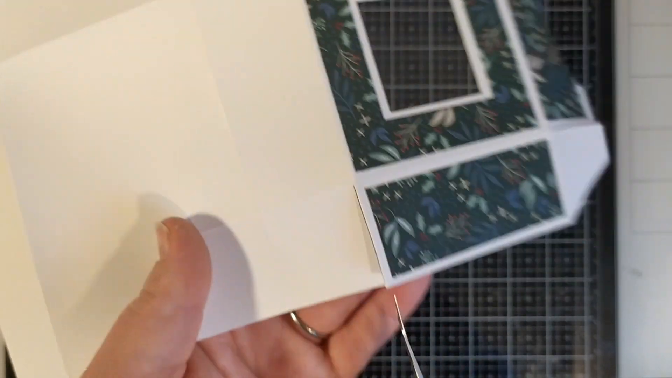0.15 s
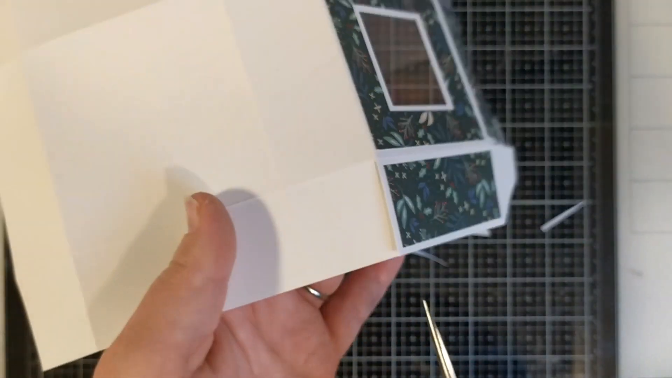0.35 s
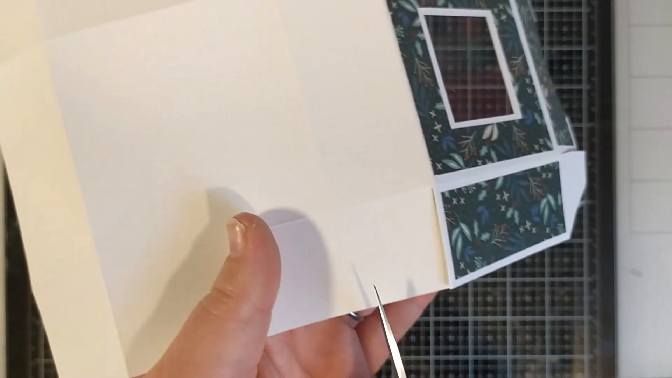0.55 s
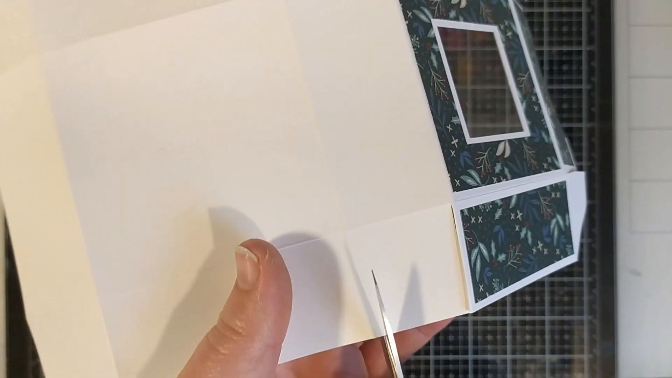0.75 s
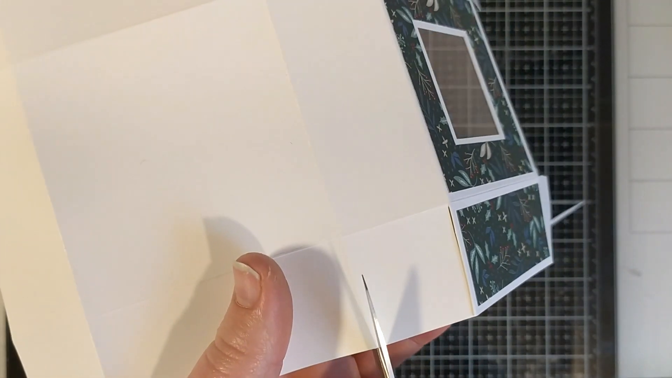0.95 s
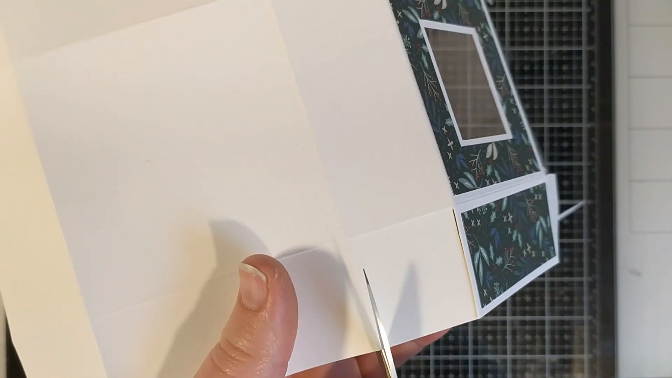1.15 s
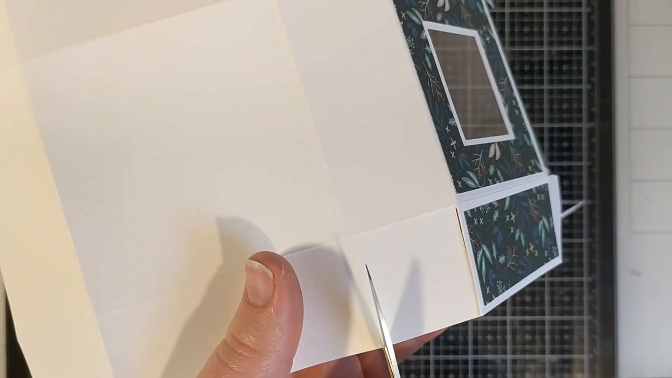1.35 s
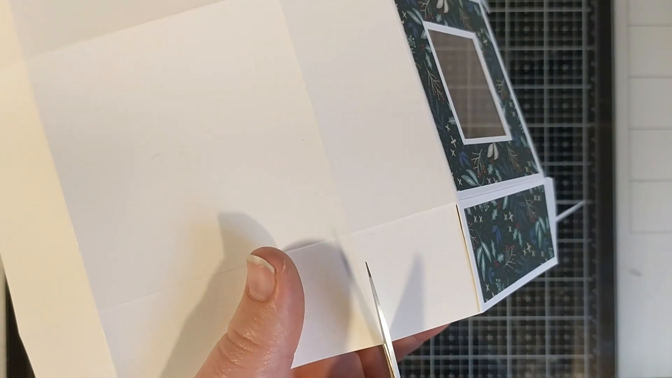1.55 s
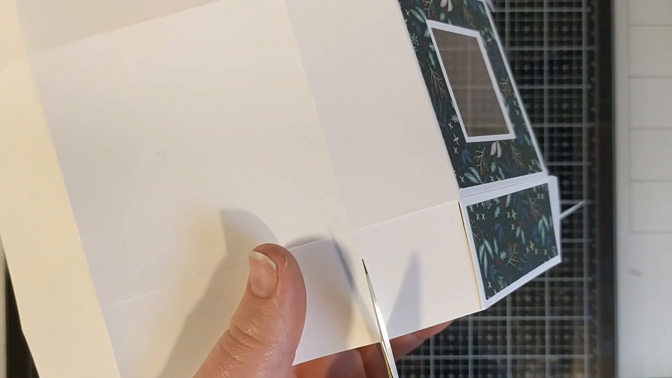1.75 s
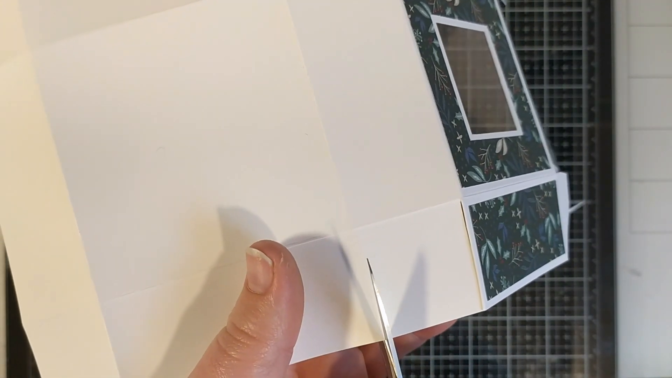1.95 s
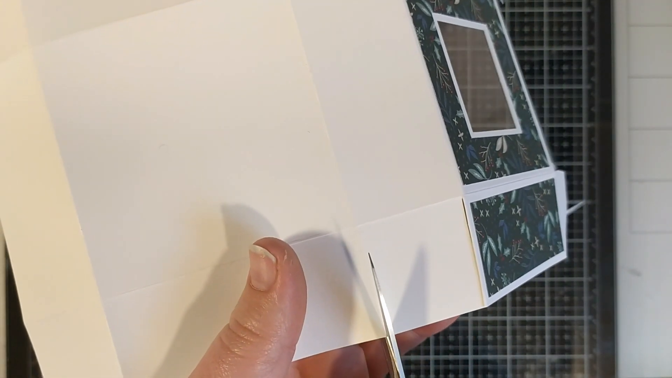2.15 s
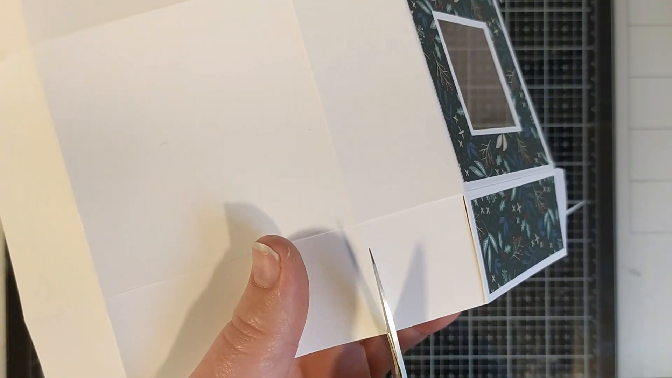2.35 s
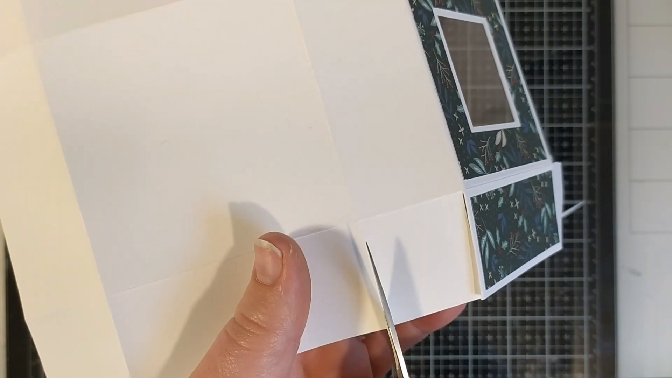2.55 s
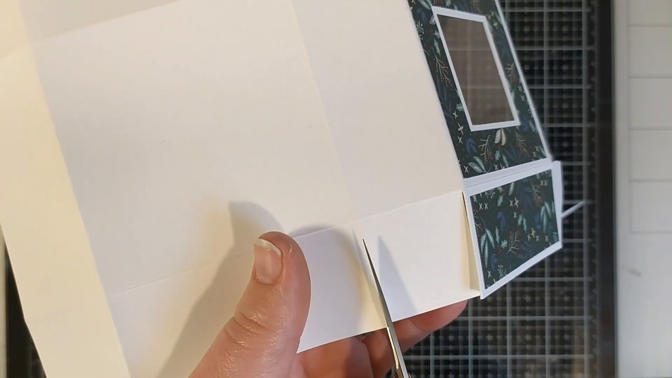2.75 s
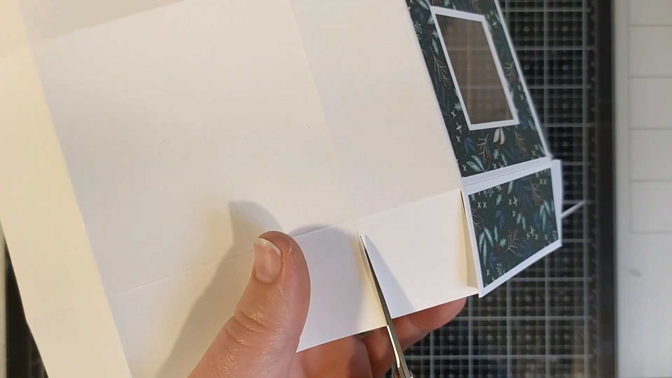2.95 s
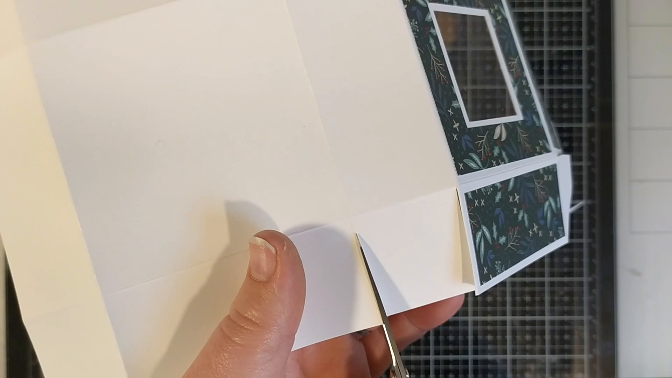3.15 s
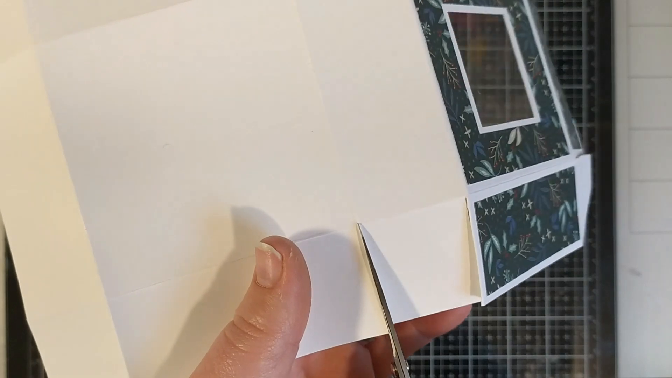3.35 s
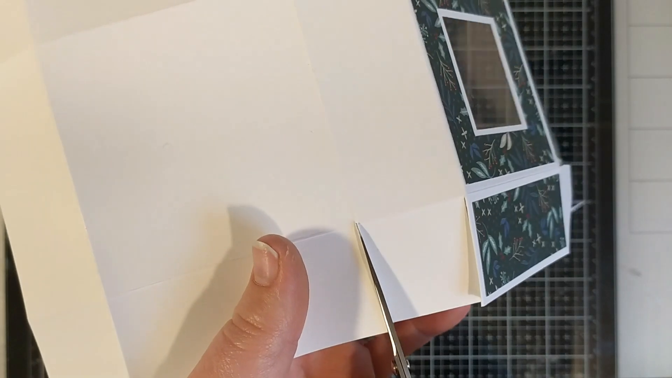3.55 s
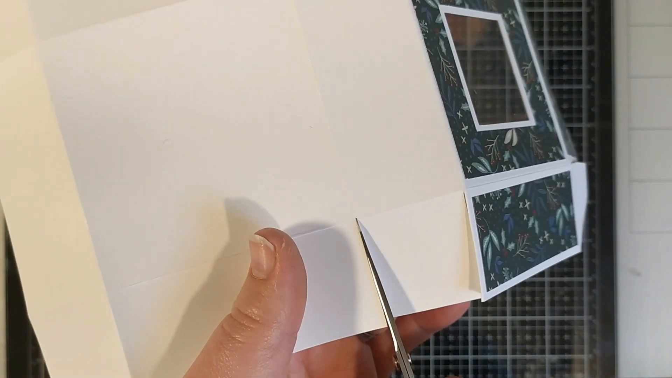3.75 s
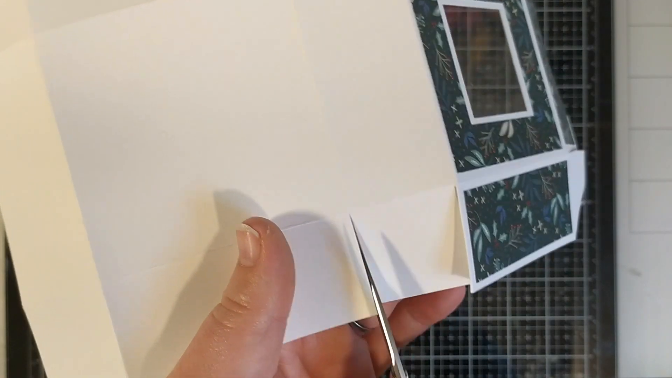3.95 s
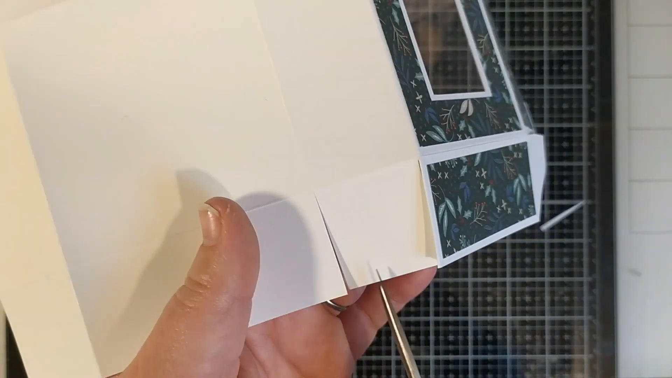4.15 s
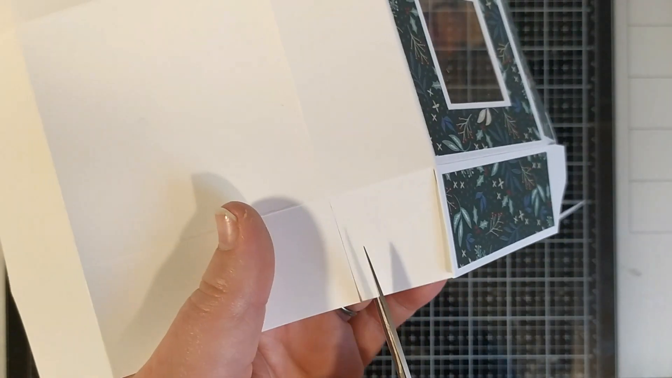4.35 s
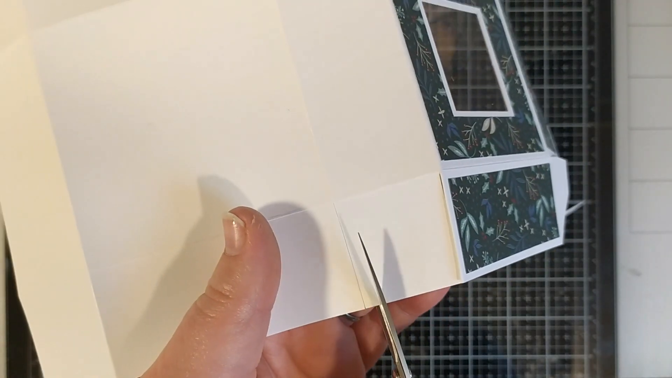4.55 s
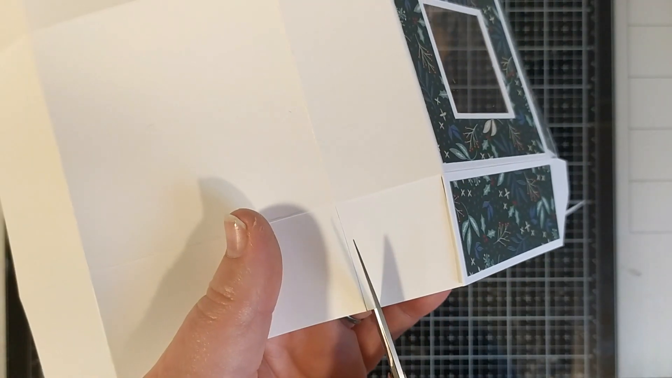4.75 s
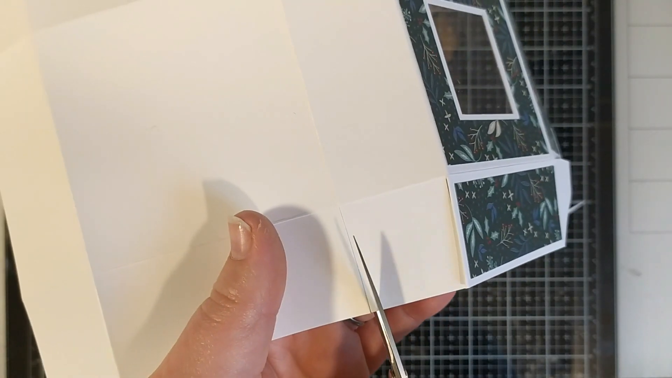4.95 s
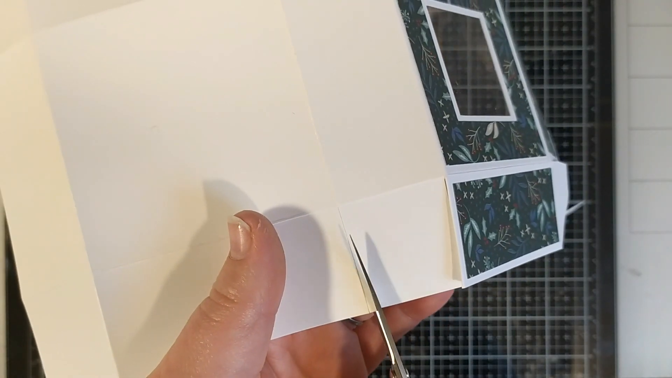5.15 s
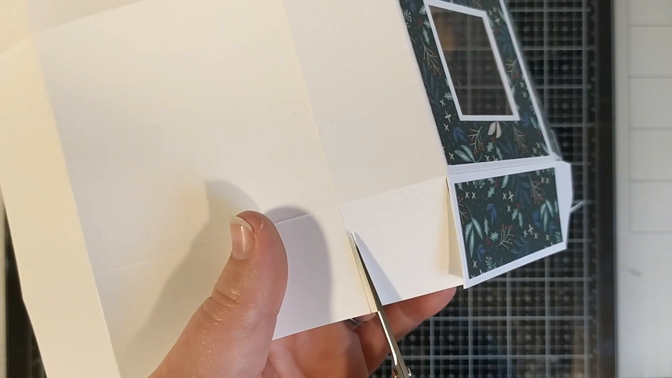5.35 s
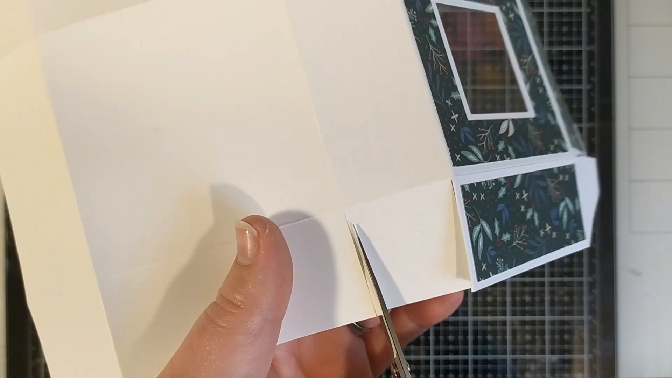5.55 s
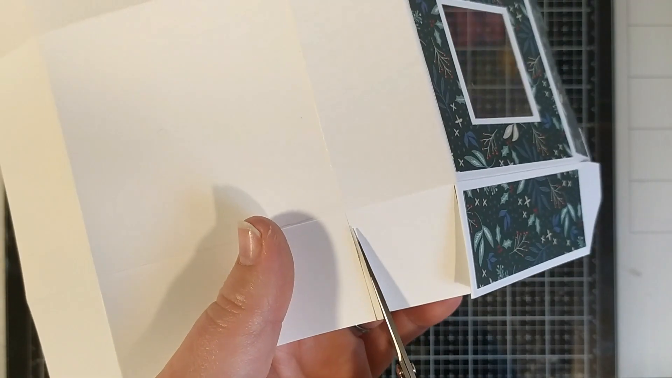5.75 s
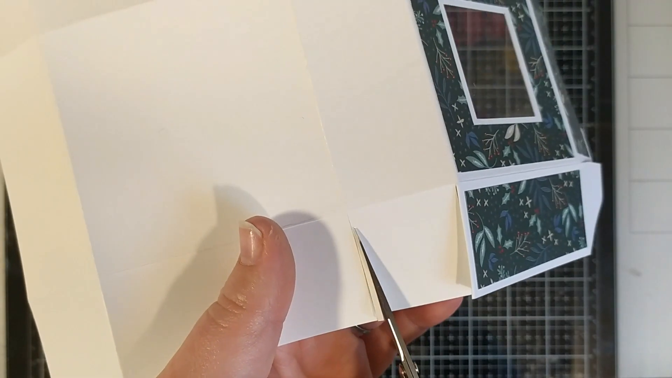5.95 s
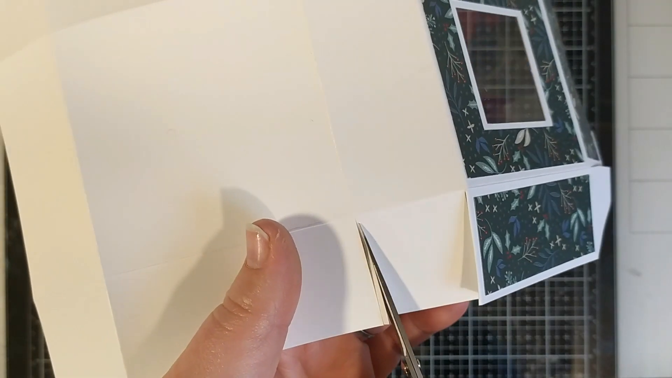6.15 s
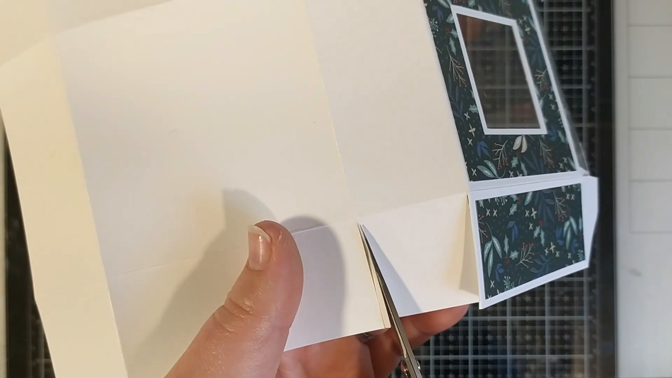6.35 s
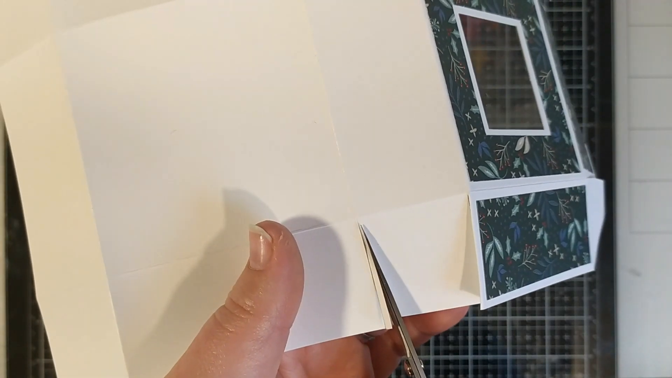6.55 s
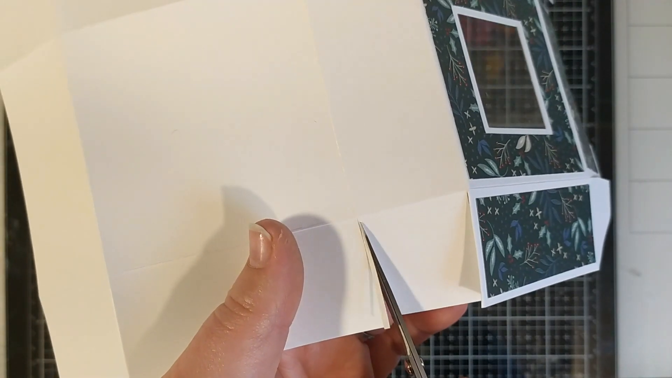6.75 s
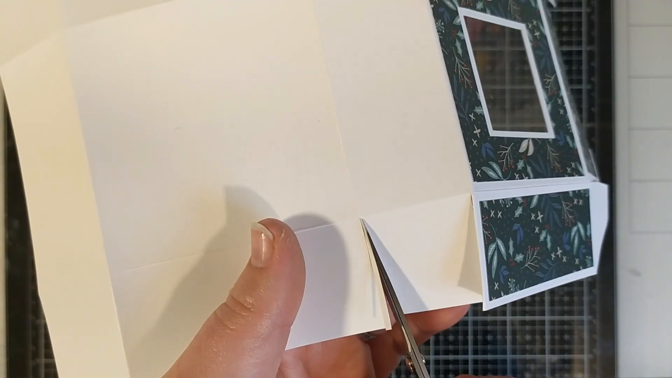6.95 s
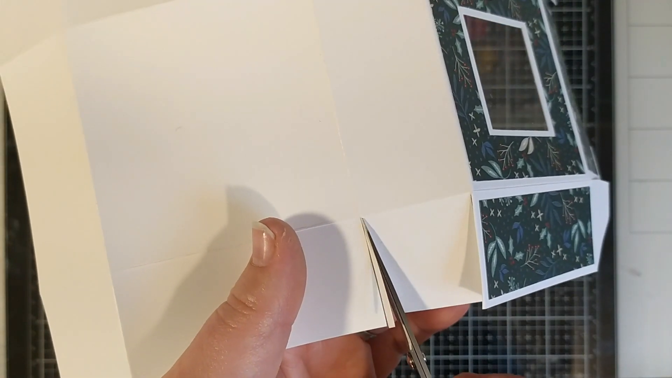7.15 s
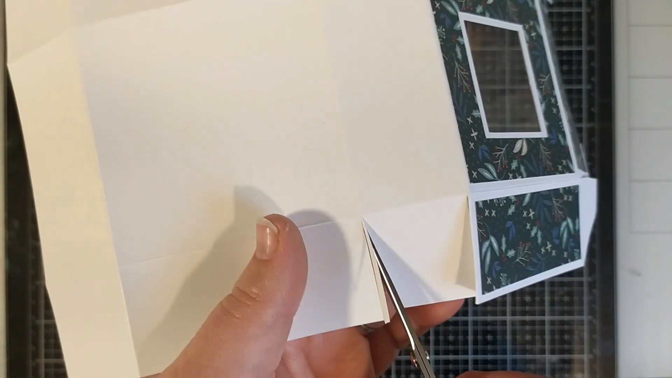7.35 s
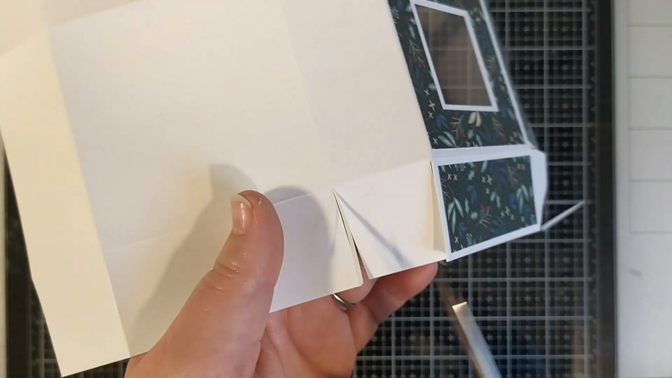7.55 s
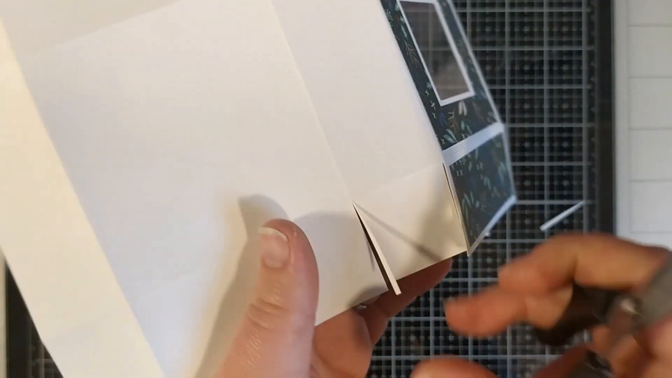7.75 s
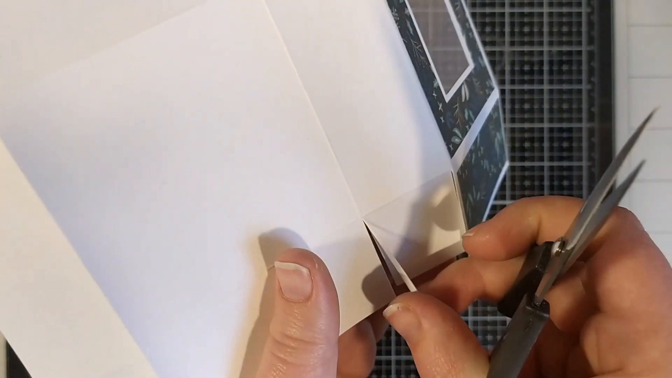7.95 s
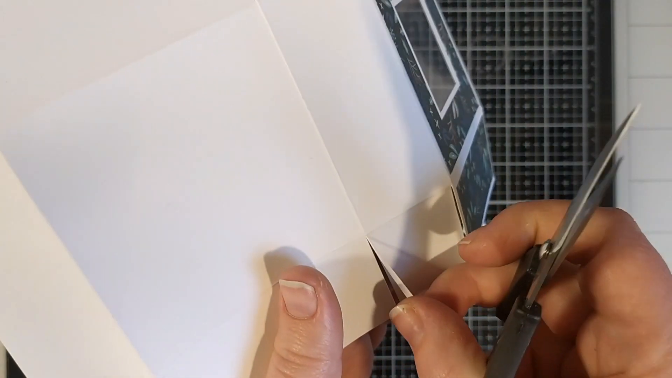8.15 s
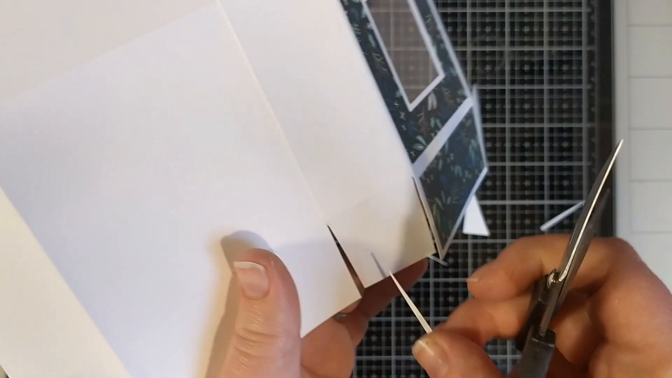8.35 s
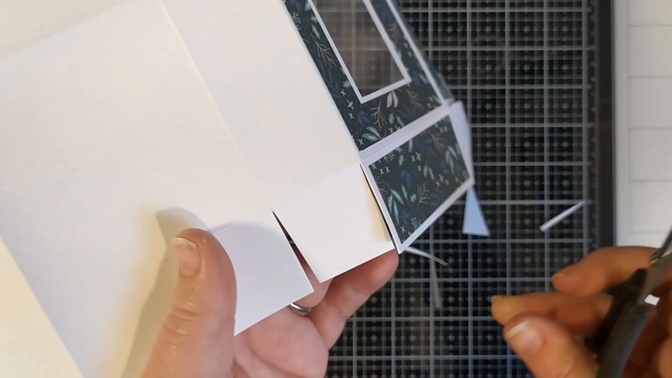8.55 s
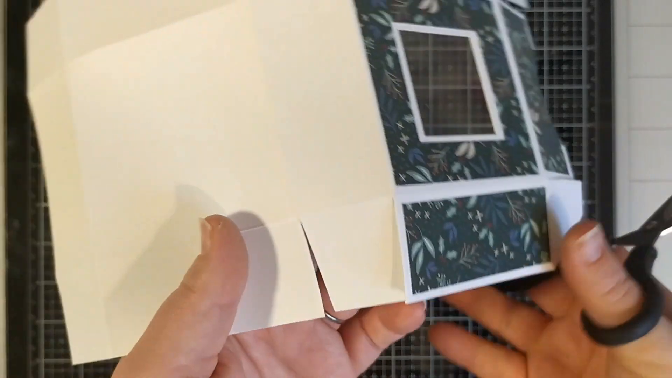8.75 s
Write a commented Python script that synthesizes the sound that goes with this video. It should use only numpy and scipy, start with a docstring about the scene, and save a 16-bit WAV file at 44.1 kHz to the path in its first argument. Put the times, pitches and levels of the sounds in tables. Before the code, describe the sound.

Scissors cut slits into stiff card, close to a stereo microphone in a small quiet room. Fibres snap and the blades slide with a bright hiss, then a dull soft bump. After a pause come several crunching cuts with dry papery knocks, the last ending in the loudest, sharpest crack. The blades slide out and the card is handled softly over faint, steady air noise.

```python
"""Scissors cut slits into stiff card over a craft table in a small quiet room, whose steady air noise runs throughout.
At first fibres snap as broadband bursts and the blades slide over the card with a fine hiss; a dull rumble follows.
Further cuts crunch as coarse grains, snap and slide; blows set the sheet swinging as damped, gliding sines.
The last cut ends in a sharp crack, then smooth slides draw the blades out and the card crunches softly in the hand.
Snaps, crunches and slides are all filtered by the resonant cutting edge and sheet, with dense reflections."""
import sys
import numpy as np
from scipy import signal
from scipy.fft import rfft, irfft
from scipy.io import wavfile
from scipy.ndimage import uniform_filter1d

SR = 44100
rng = np.random.default_rng(int(sys.argv[2]) if len(sys.argv) > 2 else 0)


def store_wav(level_fs):
    """Save 16-bit WAV to argv[1]."""
    pcm = np.round(np.clip(np.atleast_2d(level_fs), -1, 1) * 32767)
    wavfile.write(sys.argv[1], SR, pcm.T.astype(np.int16))


N = 392029
TIME = np.arange(N) / SR
TAPS = 8192   # length of the filters and of each swing, samples
TAP_HZ = np.fft.rfftfreq(TAPS, 1 / SR) + 1   # kept above zero for logarithms
TAP_S = np.arange(TAPS) / SR

# resonant bodies: broad colours of sheet and cutting edge, columns [f/Hz, level/dB per Hz]
SHEET_COLOUR = [(70, -38), (150, -3), (250, 4), (420, 7.5), (700, -1), (1050, 3), (1580, -5), (2000, -3),
                (2800, -0.5), (3800, -4.5), (4800, -4.5), (7000, -23)]
EDGE_COLOUR = [(2000, -42), (4200, -10), (5200, -5), (7000, -5.5), (8300, -3.5), (9300, -2), (10500, -4.5),
               (11700, -14), (13500, -25.5), (15000, -25.5), (16500, -42.5)]
# resonances standing out of those colours, columns [f/Hz, width/Hz, lift/dB]
SHEET_MODES = [(434, 45, 5), (972, 50, 3), (1186, 35, 8), (1900, 70, 8), (2012, 70, 7), (2549, 80, 5),
               (2790, 80, 4), (3475, 55, 4), (4230, 70, 3)]
BLADE_MODES = [(8830, 300, 4), (9240, 140, 3), (9610, 70, 4), (10510, 60, 4)]
# the two microphone ports colour the edge differently, columns [f/Hz, left minus right level/dB]
PORT_COLOUR = [(5000, 3), (7800, -4.5), (10000, -1.5), (12000, 8)]


def scissors_and_card():
    """Source-filter principle: snaps, crunches and slides all excite the same edge and sheet."""
    # 1 dB per octave between the corners
    slope = log_response(np.log2(np.clip(TAP_HZ, 180, 3200) / 1000))
    # leans 1 dB towards the high treble
    top = log_response(np.interp(TAP_HZ, [6000, 9000, 12500, 16000], [-.4, 0, 1, 0]))
    port_lean = log_response(at_hz(PORT_COLOUR, TAP_HZ)) * np.array([[1], [-1]]) / 2
    edge_body = body(EDGE_COLOUR, BLADE_MODES) + port_lean
    sheet_body = body(SHEET_COLOUR, SHEET_MODES)
    bodies = edge_body, sheet_body, slope, top
    return snaps(bodies) + crunches(bodies) + slides(bodies)


# tilt of a snap of middling sheet level, and tilt added by each dB of sheet above that level
SNAP_MID_DB, SNAP_TILT_DB_PER_OCTAVE, SNAP_BRIGHTENS = -44, 0.5, 0.15
EDGE_BRIGHTENS = 0.42   # tilt added for each dB of edge over sheet, within limits
CRACK_CLEAN_DB = 11.5   # an instant crack has this much less edge scatter, half as much less sheet and room scatter
# fibres giving way and blades ticking,
# columns [t/s, length/s, edge level/dB, sheet level/dB, left minus right level/dB]
SNAPS = [(.001, 0.0023, -40.5, -46.5, 1), (0.009, 0.013, -47, -49, -6), (0.023, 0.0022, -51.5, -52, 3),
         (0.204, 0.0063, -50.5, -45.5, 7), (0.373, 0.022, -57, -53.5, 0), (.478, 0.0073, -63.5, -58, -3),
         (0.706, 0.026, -46.5, -54, -1), (0.914, 0.0062, -61.5, -64.5, -2), (2.69, 0.026, -53.5, -50.5, 0),
         (2.919, 0.0096, -55, -50, 7), (3.002, 0.012, -45.5, -45, 4), (3.039, .013, -48, -56, -2),
         (3.064, 0.0063, -43.5, -41.5, -3), (3.101, 0.0069, -44.5, -43.5, -12.5),
         (3.145, 0.016, -53.5, -49, 1), (3.66, 0.0056, -54, -50, -9), (3.682, 0.008, -42, -41, -3),
         (3.727, 0.0073, -47, -49, 0), (3.7595, 0.0038, -48, -43.5, -4), (3.7966, 0.0041, -42.5, -42, -6),
         (3.99, 0.0025, -44, -45.5, -1), (4.712, 0.0085, -63.5, -56, -1), (4.732, 0.0022, -61, -62, 0),
         (4.798, 0.0053, -55.5, -55, -3), (4.993, 0.0078, -55.5, -57, -1), (5.101, 0.01, -57.5, -53.5, 0),
         (5.161, 0.0076, -55, -55.5, -2), (5.217, 0.015, -52.5, -52, 0), (5.248, 0.0085, -52, -52, 4),
         (5.275, 0.016, -46.5, -44.5, 2), (5.313, 0.0088, -45, -47.5, 2), (5.341, 0.004, -42.5, -48, -2),
         (5.354, 0.0031, -41, -43, -1), (5.371, 0.00077, -52, -54, 5), (5.393, 0.0024, -48.5, -45, -12),
         (5.811, 0.0038, -47.5, -50.5, -5), (5.8145, 0.0016, -41.5, -43.5, -3),
         (5.8542, 0.002, -41.5, -46.5, 5), (5.8564, 0.0048, -37, -38.5, -2.5),
         (5.944, 0.0092, -51, -53.5, -1), (6.213, 0.0057, -58.5, -69, -1), (6.467, 0.0098, -62.5, -59, 0),
         (6.622, 0.0064, -41.5, -45.5, -2), (6.6435, 0.0012, -36, -42, 5), (6.647, 0.0022, -47, -44, -1),
         (6.6786, 0.002, -42.5, -43, -1), (6.8586, 0.0045, -59.5, -44.5, 0), (7.306, .0018, -49, -41, 2),
         (7.317, 0.0018, -36, -34.5, 0), (7.335, 0.0022, -51, -37, -2), (7.3557, 0.00064, -24, -25.5, 4),
         (7.384, 0.0073, -41.5, -39, -6), (7.467, 0.0042, -40.5, -38.5, 2), (7.472, 0.0048, -38, -41, -1),
         (8.257, 0.0044, -49.5, -48, -5), (8.308, 0.0089, -59, -55, 2), (8.706, 0.0051, -54.5, -59, 5),
         (8.808, 0.027, -54, -60, 2)]


def snaps(bodies, crack=0.21, build_up=0.079):
    """Brittle fracture: a short snap is one broadband crack, a longer one a growing run of tearing fibres."""
    out = np.zeros((2, N))
    t = TAP_S[:TAPS // 4]
    for start, length, edge_db, sheet_db, side_db in SNAPS:
        length = max(length, 1e-4)
        run = (1 - np.exp(-t / (build_up * length))) / (1 + (t / length) ** 4)
        burst = unit_energy(run * fibres(len(t), per_s=3500, spread_db=4.5, hiss=0.37))
        sharpness = np.exp(-length / 0.0028)
        burst[0] += crack * np.e * sharpness
        burst = irfft(even(rfft(burst, TAPS), size=110))[:len(t)]
        # levels are rms over 10 ms
        burst = unit_energy(burst) * np.sqrt(SR / 100)
        tilt_db = SNAP_TILT_DB_PER_OCTAVE + SNAP_BRIGHTENS * (sheet_db - SNAP_MID_DB)
        tilt_db += EDGE_BRIGHTENS * np.clip(edge_db - sheet_db, -4, 5)
        clean_db = CRACK_CLEAN_DB * sharpness
        add(out, start, radiate(burst, bodies, edge_db, sheet_db, tilt_db, side_db, clean_db=clean_db))
    return out


# card crunching in a cut or bending in the hand, columns [start t/s, end t/s, edge level/dB,
# sheet level/dB, swell from start to end/dB, softening at both ends/dB, left minus right level/dB]
CRUNCHES = [(2.473, 2.672, -65, -65, 0, -2.5, 1.5), (2.706, 2.909, -58.5, -58, 13.5, 6, -0.5),
            (2.949, 3.057, -51, -53.5, 1, 1.5, 0), (3.628, 3.806, -63, -65, -18, 13, -3),
            (5.082, 5.384, -54.5, -56, 14.5, 6, 0), (5.793, 5.864, -60, -60, 1, 8, -1),
            (6.613, 6.698, -68, -64, 14, -6, 1), (7.356, 7.469, -58, -47, -6.5, -6, 2),
            (8.526, 8.889, -69, -67.5, 6.5, 2, -0.5)]


def crunches(bodies):
    """Impulsive noise: sparse fractures of widely uneven size crunch as the card gives way."""
    coarse = fibres(N, per_s=1300, spread_db=4.0, hiss=.12)
    return strokes(bodies, CRUNCHES, coarse, tilt_db=-0.5, gloss_db=2.0, judder_db=1.5,
                   attack_s=0.0015, release_s=0.0043)


# blades or fingers sliding along the card, columns [start t/s, end t/s, edge level/dB,
# sheet level/dB, swell from start to end/dB, softening at both ends/dB, left minus right level/dB]
SLIDES = [(0.056, 0.211, -41.5, -53, -3, 9, 0.5), (0.73, 0.825, -62, -63.5, -1, 0, 0),
          (0.888, 1.083, -68.5, -68, -6, 5.5, 3), (1.655, 1.711, -61, -59.5, -8, 8, 3),
          (1.907, 1.97, -66.5, -66.5, -15, -9.5, 1), (3.254, 3.366, -52, -54.5, -3.5, -2.5, 1),
          (3.983, 4.073, -44, -46, -0.5, 2, 1), (4.413, 4.624, -57, -60, -19, 4.5, -3.5),
          (5.528, 5.601, -54, -53.5, -4, -4.5, -3), (6.085, 6.179, -56, -54.5, -18.5, -3, -2),
          (6.218, 6.249, -61.5, -62, 1, -5, 0), (6.394, 6.417, -57, -49.5, -8, -2, -3),
          (6.815, 6.878, -64.5, -55.5, -9, -.5, -3), (6.95, 7.022, -71, -67.5, -18, -2, -1),
          (7.485, 7.554, -56.5, -59.5, -11, 1, 3), (7.548, 7.94, -65, -68.5, -5, 0, 0),
          (7.932, 8.111, -59, -59.5, -19, 5, -0.5)]


def slides(bodies):
    """Friction noise: dense, nearly equal grains under the unsteady pressure of a trembling hand."""
    pressure = amp(1.0 * resonant_noise(34, 45) + 1.0 * resonant_noise(6.9, 21))
    fine = pressure * fibres(N, per_s=4500, spread_db=1.1, hiss=0.18)
    return strokes(bodies, SLIDES, fine, tilt_db=1.07, gloss_db=-2, judder_db=0.5,
                   attack_s=0.0093, release_s=0.0082)


NEW_SPOT_S = .07   # a moving contact reaches a new spot on the card this often
# echo along the blade: mid-stroke delay, share by which it shrinks, strength per dB of edge over sheet
BLADE_ECHO_S, BLADE_ECHO_SHRINKS, BLADE_ECHO_PER_DB = .000115, .3, 0.12


def strokes(bodies, table, grain, tilt_db, gloss_db, judder_db, attack_s, release_s):
    """Stick-slip and comb filtering: grains judder, and an ever shorter blade echo shifts their colour."""
    out = np.zeros((2, N))
    rasp = unit_rms(grain * amp(judder_db * resonant_noise(53.0, 50)))
    for start, end, edge_db, sheet_db, swell_db, arch_db, side_db in table:
        span = slice(int(start * SR), int((end + 0.099) * SR))
        t = TIME[span]
        touch = 1 - np.exp(-(t - t[0]) / attack_s)
        lift_off = (1 + np.maximum(t - end, 0) / release_s) ** 3.0
        travel = np.clip((t - start) / (end - start), 0, 1) - .5
        level_db = swell_db * travel - arch_db * (2 * travel) ** 2
        drive = rasp[span] * touch / lift_off * amp(level_db)
        # the echo comes sooner as the contact runs towards the tip
        delay = BLADE_ECHO_S * (1 - BLADE_ECHO_SHRINKS * travel)
        echo = np.interp(t - delay, t, drive)
        share = np.clip(BLADE_ECHO_PER_DB * (edge_db - sheet_db), 0, .5)
        drive = (drive + share * echo) / np.hypot(1, share)
        # each spot radiates with reflections of its own
        spots = np.arange(0, min(len(t), (end - start) * SR), NEW_SPOT_S * SR).astype(int)
        for at, piece in zip(spots, np.split(drive, spots[1:])):
            add(out, t[at], radiate(piece, bodies, edge_db, sheet_db, tilt_db, side_db, gloss_db))
    return out


KNOCK_SPREAD_OCTAVES = 0.497
# a blow bends the sheet: typical share by which its swings shift at first, and time constant of the return
FLEX_DETUNE, UNBEND_S = .06, .012
# blows on the whole sheet, columns [t/s, level/dB, favoured f/Hz]
KNOCKS = [(.001, -39.5, 174), (.001, -46.5, 467), (.212, -38.5, 266), (3.8, -38.5, 850), (4.065, -45, 300),
          (5.223, -41, 235), (5.817, -36.5, 690), (5.857, -42.5, 360), (6.631, -38, 283), (6.646, -44, 232),
          (7.357, -25, 2710), (7.362, -31, 1110), (7.363, -37.5, 290), (7.39, -34.5, 487),
          (7.393, -36, 1003), (7.407, -35, 1450), (7.4427, -39.5, 900), (8.2596, -31, 263),
          (8.273, -37.5, 162)]
# swings of the sheet, columns [f/Hz, relative level/dB, 60 dB decay t/s]
SWINGS = [(172, -8.5, 0.18), (244, 1, 0.046), (436, 4, 0.093), (683, 1, 0.024), (868, 2.5, 0.024),
          (1195, 4, 0.056), (1974, 5.5, 0.032), (2760, 0.5, 0.025), (3270, -5, 0.036)]


def knocks(rise_s=0.00075):
    """Modal excitation: each blow stirs the damped swings near its favoured pitch, which glide as it unbends."""
    out = np.zeros((2, N))
    for start, db, favoured_hz in KNOCKS:
        for hz, mode_db, t60 in SWINGS:
            share = np.exp(-(np.log2(hz / favoured_hz) / KNOCK_SPREAD_OCTAVES) ** 2)
            bend = FLEX_DETUNE * rng.standard_normal() * np.exp(-TAP_S / UNBEND_S)
            pitch = hz * (1 + bend)
            envelope = amp(db + mode_db - 60 * TAP_S / t60) * (1 - np.exp(-TAP_S / rise_s))
            swing = envelope * np.sin(2 * np.pi * np.cumsum(pitch) / SR)
            add(out, start, share * swing * pan(-2.8))
    return out


RUMBLE_S = 1.2135   # start
# pass band of the hollow note, columns [low f/Hz, high f/Hz]
RUMBLE_BAND = (275, 395)
# envelopes of the hollow note and of the bass, columns [level/dB, attack t/s, decay/dB per s]
RUMBLE_NOTE = (-41, 0.01, 90)
RUMBLE_BASS = (-44, 0.072, 69)


def rumble():
    """Band-limited noise with exponential decay: a dull hollow note over a bass that lingers."""
    band = signal.butter(3, RUMBLE_BAND, "band", fs=SR, output="sos")
    hollow = signal.sosfilt(band, rng.standard_normal(N))
    note = unit_rms(hollow) + amp(-13.5) * resonant_noise(640, 800)
    note = signal.sosfilt(signal.butter(4, 1100, fs=SR, output="sos"), note)
    bass = resonant_noise(73, 75)
    return rise_and_fade(*RUMBLE_NOTE, RUMBLE_S) * note + rise_and_fade(*RUMBLE_BASS, RUMBLE_S) * bass


AIR_DB, WHINE_DB = -61, -83.5
WHINE_HZ, WHINE_WIDTH_HZ = 2955, 45   # the pitch wanders by half the width, rms
# room air common to both channels, columns [f/Hz, relative level/dB per Hz]
AIR_COLOUR = [(12, -7.5), (22, 2.5), (60, -10.5), (95, -9), (125, -19), (168, -11), (377, -12.5),
              (700, -21), (2320, -31.5), (2910, -32.5), (3200, -36.5), (6500, -38.5), (9500, -35),
              (16000, -56)]
# likeness of the air in the two channels, columns [f/Hz, correlation -1 to 1]
AIR_LIKENESS = [(180, 0.41), (550, 0.18), (1650, -0.25), (4970, 0.04)]


def air():
    """Diffuse-field noise: steady, most alike at both ports in the bass, with a thin whine of even strength."""
    hz = np.fft.rfftfreq(N, 1 / SR) + 1
    alike = np.clip(at_hz(AIR_LIKENESS, hz), -.95, .95)
    mid, side = rfft(rng.standard_normal((2, N))) * amp(at_hz(AIR_COLOUR, hz))
    side = side * np.sqrt((1 - alike) / (1 + alike))
    hush = unit_rms(irfft(np.array([mid + side, mid - side]), N))
    pitch = WHINE_HZ + WHINE_WIDTH_HZ / 2 * resonant_noise(45, 74)
    whine = unit_rms(np.sin(2 * np.pi * np.cumsum(pitch) / SR))
    return amp(AIR_DB) * hush + amp(WHINE_DB) * whine


def radiate(drive, bodies, edge_db, sheet_db, tilt_db, side_db, gloss_db=0, clean_db=0,
            bend_delay_s=0.001403):
    """Convolution and dispersion: one contact heard through edge and sheet, with its own reflections."""
    edge_body, sheet_body, slope, top = bodies
    # harder contacts are briefer and reach higher
    hardness_db = max(edge_db + 63.0, 0) * 0.21
    room = amp(-4.0 - clean_db / 2) * scatter(t60=0.13, onset_s=0.0031, above_hz=1200)
    edge_scatter = amp(5.0 - clean_db) * scatter(t60=0.033, onset_s=0.000273, above_hz=690)
    edge_paths = ports(.00003 + .00004 * rng.standard_normal()) + edge_scatter + room
    # bending waves cross the sheet slowly, the low ones last; the delay holds at 400 Hz
    bending = np.exp(-4j * np.pi * bend_delay_s * np.sqrt(TAP_HZ * 400))
    sheet_scatter = amp(2.5 - clean_db / 2) * scatter(t60=0.035, onset_s=0.000099, above_hz=730)
    sheet_paths = bending * (ports(.00007) + sheet_scatter + room)
    edge_filter = np.exp(edge_body + (hardness_db + gloss_db) * top)
    sheet_filter = np.exp(sheet_body + tilt_db * slope)
    edge = amp(edge_db) * pan(side_db) * response(edge_filter * even(edge_paths, size=150))
    sheet = amp(sheet_db) * pan(-1.5) * response(sheet_filter * even(sheet_paths, size=80))
    return signal.fftconvolve(drive[None], edge + sheet, axes=1)


def fibres(size, per_s, spread_db, hiss):
    """Shot noise: fractures of uneven size at random moments over a finer friction hiss, rms 1."""
    breaks = rng.random(size) < per_s / SR
    sizes_db = spread_db * np.minimum(rng.exponential(1, size), 4)
    sizes = amp(sizes_db) * rng.choice([-1, 1], size)
    return unit_rms(breaks * sizes + hiss * rng.standard_normal(size))


def scatter(t60, onset_s, above_hz):
    """Reverberant decay: dense reflections, different at each port and weak in the bass, as a spectrum."""
    decay = amp(-60 * TAP_S / t60) * (1 - np.exp(-TAP_S / onset_s))
    echoes = unit_energy(rng.standard_normal((2, TAPS)) * decay)
    return rfft(signal.lfilter(*signal.butter(1, above_hz, "high", fs=SR), echoes))


def ports(lag_s):
    """Interaural-style time difference: the direct sound reaches the left port later by the lag."""
    return np.exp(-2j * np.pi * TAP_HZ * lag_s * np.array([[1], [0]]))


def body(colour, modes):
    """Resonance: log response of a broad colour with modes standing out of it."""
    level_db = at_hz(colour, TAP_HZ)
    for hz, width, lift in modes:
        level_db = level_db + lift / (1 + (2 * (TAP_HZ - hz) / width) ** 2)
    return log_response(level_db)


def log_response(level_db):
    """Causality: complex log spectrum with these levels and minimum phase, so nothing sounds early."""
    cepstrum = irfft(np.log(amp(level_db)))[:TAPS // 2]
    return 2 * rfft(cepstrum, TAPS) - cepstrum[0]


def response(spectrum):
    """Causal windowing: impulse response of energy 1, shifted a few samples later and faded out towards its
    end."""
    return unit_energy(np.roll(irfft(spectrum), 16, axis=1) * (1 - TAP_S / TAP_S[-1]))


def even(spectrum, size):
    """Spectral whitening: keeps the fine ripple and levels out broad humps and hollows."""
    power = np.mean(np.abs(np.atleast_2d(spectrum)) ** 2, axis=0)
    broad = uniform_filter1d(uniform_filter1d(power, size), size)
    return spectrum * np.exp(log_response(-10 * np.log10(np.maximum(broad, 1e-12))))


def resonant_noise(hz, width_hz):
    """Resonance: noise passed twice through a peak of this width, rms 1."""
    b, a = signal.iirpeak(hz, hz / width_hz, fs=SR)
    once = signal.lfilter(b, a, rng.standard_normal(N))
    return unit_rms(signal.lfilter(b, a, once))


def rise_and_fade(db, attack_s, decay_db_per_s, start):
    """Exponential decay: an envelope that rises smoothly and falls by equal dB per second."""
    t = np.maximum(TIME - start, 0)
    return amp(db - decay_db_per_s * t) * (1 - np.exp(-t / attack_s))


def add(out, start, sound):
    """Superposition: mix a sound in at a moment."""
    at = max(int(start * SR), 0)
    out[:, at:at + sound.shape[1]] += sound[:, :N - at]


def amp(db):
    """Logarithmic level: decibels to gain."""
    return 10 ** (np.asarray(db) / 20)


def pan(db):
    """Level difference: left and right gains, half the decibels each."""
    return amp(np.array([[db], [-db]]) / 2)


def unit_rms(x):
    """Effective value: scale to rms 1."""
    return x / np.sqrt(np.mean(x ** 2) + 1e-20)


def unit_energy(x):
    """Signal energy: scale each channel to energy 1."""
    return x / np.sqrt(np.sum(x ** 2, axis=-1, keepdims=True) + 1e-20)


def at_hz(points, hz):
    """Logarithmic frequency: read a table along a log axis."""
    at, value = np.transpose(points)
    return np.interp(np.log(hz), np.log(at), value)


def scene():
    """Superposition: scissors and card, blows, rumble and room air add up."""
    return scissors_and_card() + knocks() + rumble() + air()


def record(dry):
    """Band limiting: a steep elliptic low-pass cuts the top above 15.8 kHz."""
    return signal.sosfilt(signal.ellip(10, .1, 80, 15800, fs=SR, output="sos"), dry)


dry = scene()
out = record(dry)
store_wav(out)
```